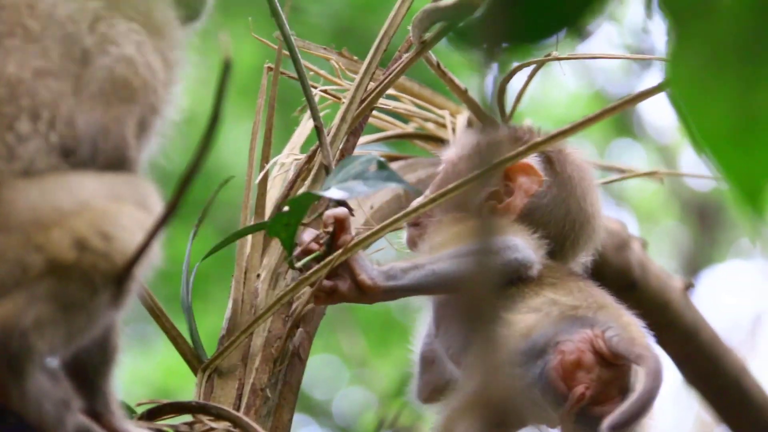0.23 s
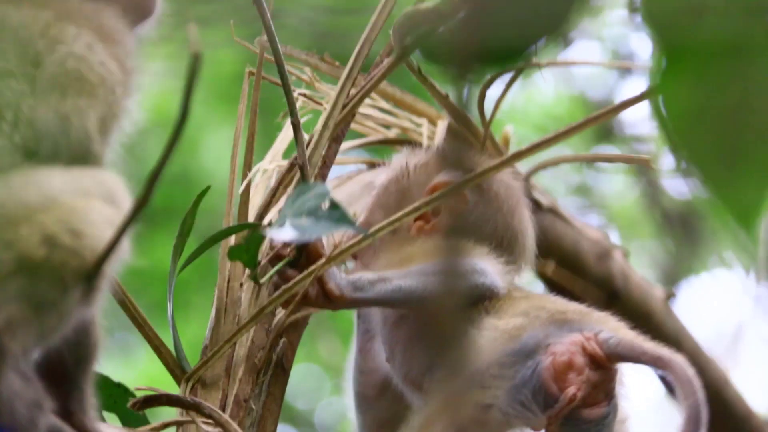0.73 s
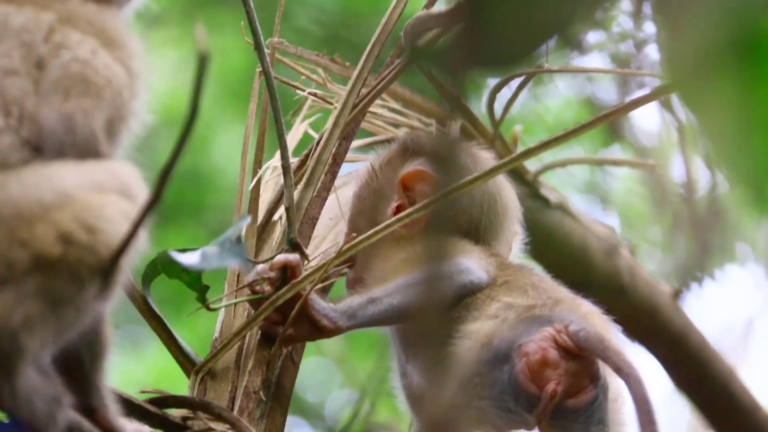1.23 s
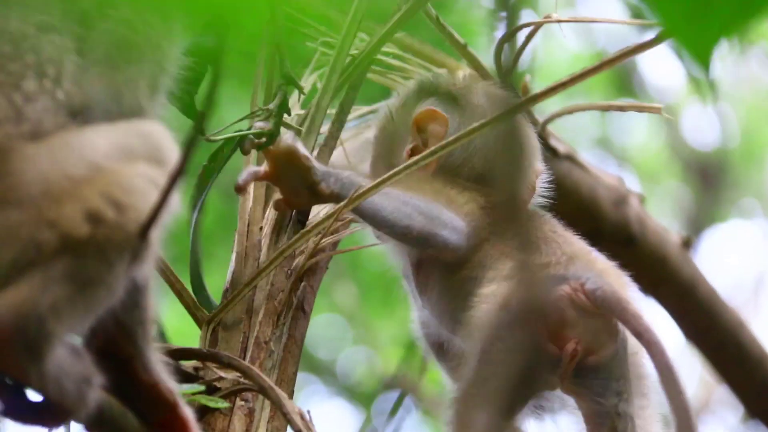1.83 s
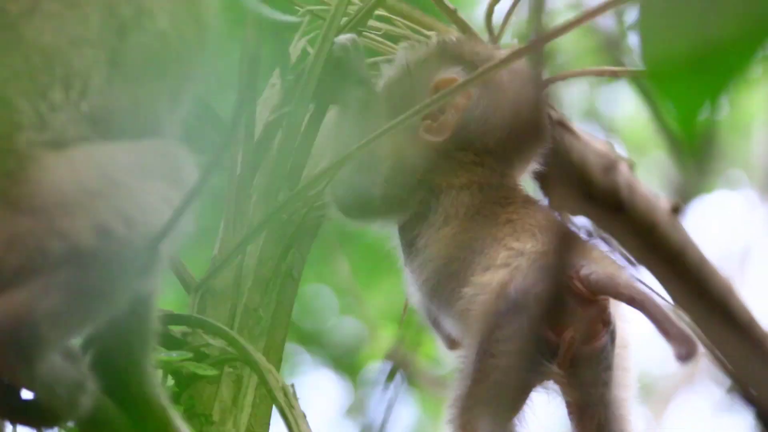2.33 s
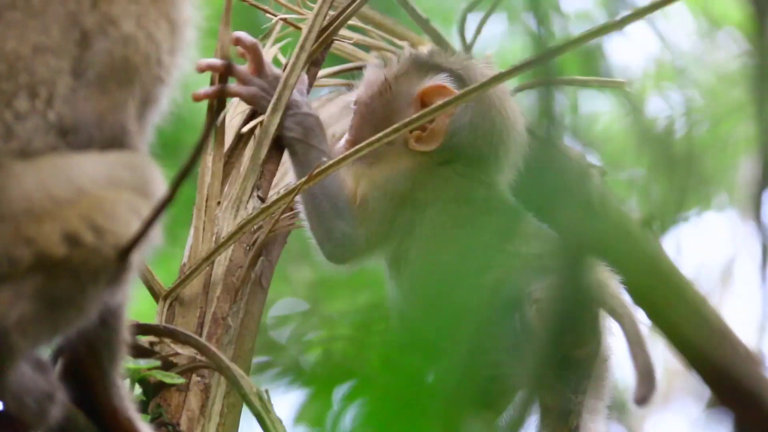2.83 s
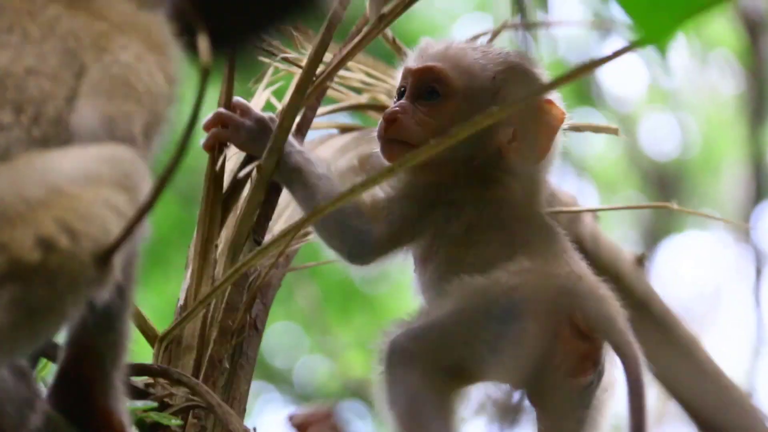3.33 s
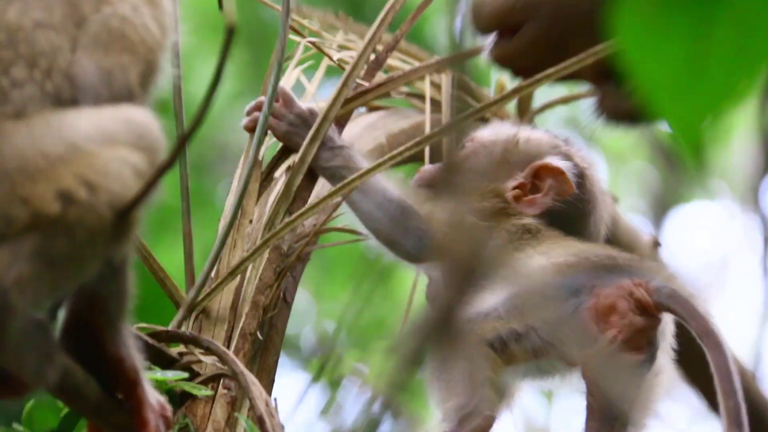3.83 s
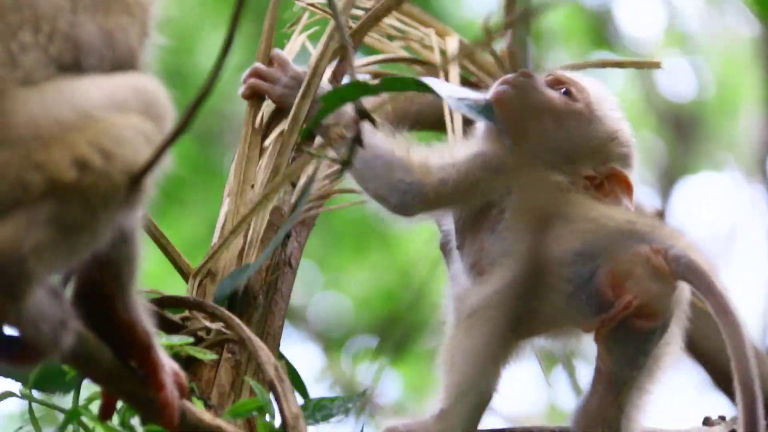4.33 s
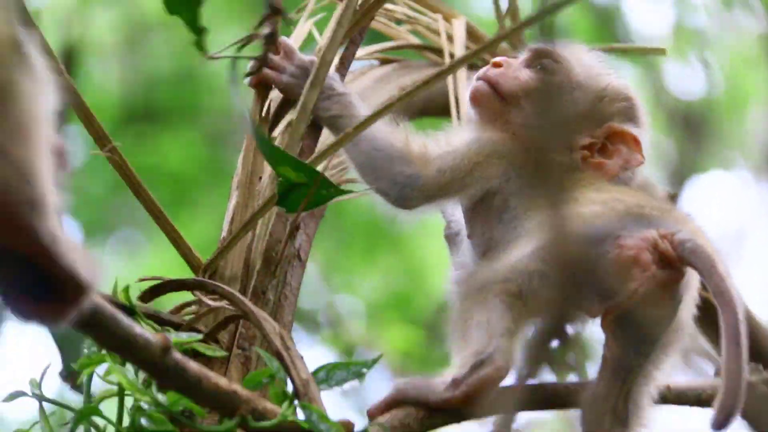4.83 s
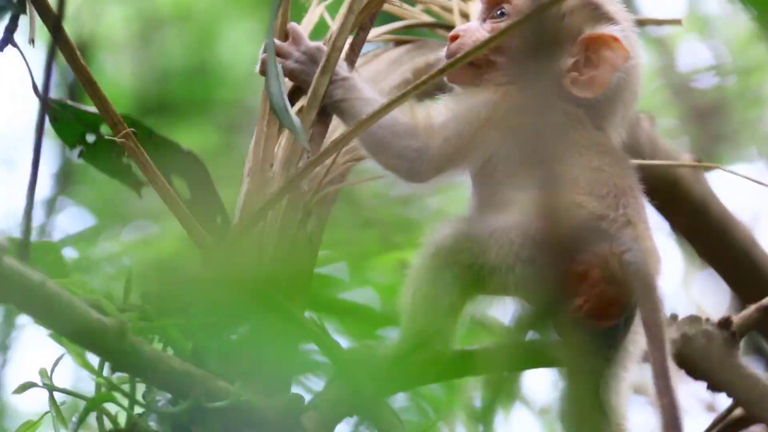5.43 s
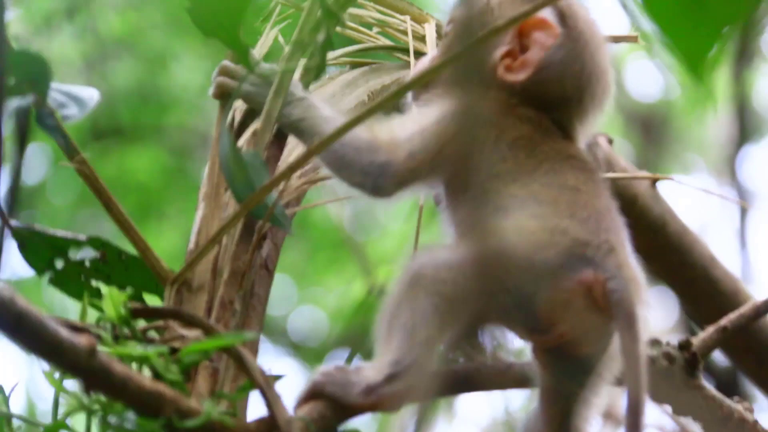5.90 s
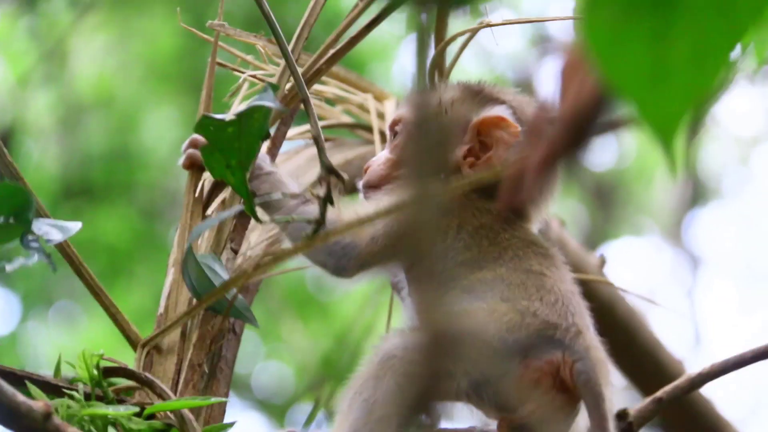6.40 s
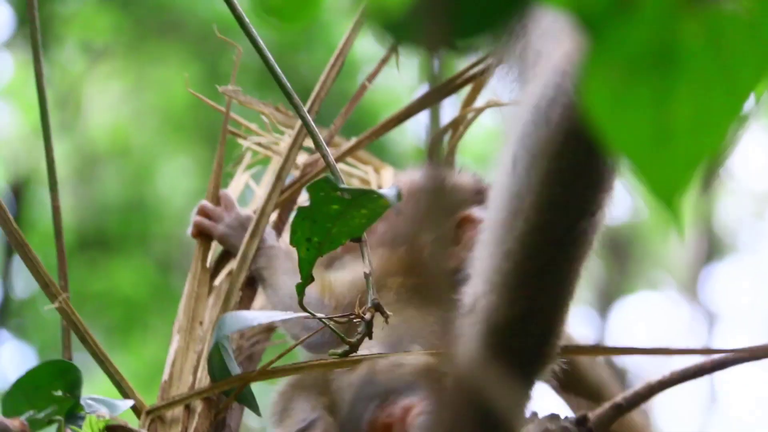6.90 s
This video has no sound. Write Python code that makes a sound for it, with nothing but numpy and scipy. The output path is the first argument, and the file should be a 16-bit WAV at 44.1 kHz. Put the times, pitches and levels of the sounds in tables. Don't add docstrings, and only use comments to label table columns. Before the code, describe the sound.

In a leafy forest, quiet hush and far rumble carry faint bird ticks, chirps, chatter, nasal trills and low dove hoots. Near three seconds a monkey whistles loudly, sliding from high to low; a lower, louder call follows, then another long, high slide. Trees smear each into echoes, and the background swells with every call before dropping back as the microphone's noise gate closes.

```python
import sys
import numpy as np
from scipy import signal
from scipy.fft import rfft, irfft, next_fast_len
from scipy.io import wavfile
from scipy.ndimage import uniform_filter1d, map_coordinates

SR = 44100
rng = np.random.default_rng(int(sys.argv[2]) if len(sys.argv) > 2 else 0)


def master_out(mix):
    frames = np.transpose(np.atleast_2d(mix))
    ceiling = np.clip(frames, -1, 1)
    pcm = np.round(ceiling * 32767).astype(np.int16)
    wavfile.write(sys.argv[1], SR, pcm)


def attenuation_scalar(level_db):
    decades = np.asarray(level_db, float) / 20
    return 10 ** decades


N = 315711

# frequency in Hz, level in dB per Hz.
LEAVES_SPECTRUM = [(90, -38.5), (140, -7), (450, -7), (1060, -9.5), (3700, -18), (5140, -30), (8000, -33),
                   (15500, -35.5)]
# frequency in Hz, level in dB per Hz.
RUMBLE_SPECTRUM = [(20, -39.5), (40, -13), (52, -4), (69, 1.5), (82, -9.5), (101, 1.5), (140, -9),
                   (180, -38)]
# time in seconds, peak level in dB.
TICKS = [(.0044, -59), (.3765, -61), (.6629, -60.5), (.9844, -60.5), (1.2416, -63), (1.7594, -59),
         (2.0482, -61.5), (2.6664, -57.5), (2.9444, -59.5), (3.2106, -64), (3.7086, -63.5), (4.0277, -63),
         (4.3173, -58.5), (4.5889, -63), (4.961, -65), (5.247, -60.5), (5.5568, -61.5), (6.1754, -59),
         (6.4702, -61.5)]
# start in seconds, length in seconds, start and end pitch in Hz, level in dB.
NOTES = [(.01, 0.043, 1923, 1574, -67.5), (0.477, 0.028, 1590, 1630, -75), (.825, .03, 3780, 3710, -71),
         (0.873, 0.025, 2510, 2390, -66), (0.935, 0.025, 2416, 2310, -62.5), (1.15, 0.045, 1836, 1850, -66),
         (1.359, 0.024, 4150, 4250, -69), (1.362, 0.017, 1250, 2500, -61), (1.41, .02, 1430, 1460, -67),
         (1.593, 0.023, 3250, 3250, -71), (2.203, 0.02, 2680, 2660, -66), (3.0, 0.02, 1390, 1555, -66),
         (6.264, 0.22, 1052, 1045, -74)]
# start in seconds, level in dB.
RISERS = [
    (.165, -68),
    (0.246, -67),
    (.335, -67),
    (.435, -66.5),
]
# length in seconds, start and end pitch in Hz.
RISER_SHAPE = (.05, 2130, 2800)
# start in seconds, level in dB.
PIPS = [
    (3.684, -94),
    (3.722, -78),
    (4.964, -80),
    (5.014, -76),
]
# length in seconds, start and end pitch in Hz.
PIP_SHAPE = (.018, 6300, 5850)
# start in seconds, start and end pitch in Hz, level in dB.
CHATTER = [(1.38, 2520, 2450, -64.5), (1.424, 2190, 2410, -52), (1.482, 2180, 2330, -63),
           (1.513, 2460, 2290, -65), (1.544, 2480, 2220, -63), (1.619, 2400, 2250, -62),
           (2.161, 2195, 2400, -54.5), (2.209, 2380, 2140, -56.5), (2.26, 2270, 2150, -58.5),
           (2.288, 2280, 2280, -62), (2.403, 2360, 2190, -65), (3.024, 2295, 2330, -53),
           (3.076, 2380, 2290, -53), (3.14, 2210, 2250, -64)]
# start in seconds, level in dB.
CHURRS = [
    (1.354, -61.5),
    (2.143, -59.5),
    (2.997, -69),
]
# multiple of the pitch, level in dB.
CHURR_PARTS = [(1, -8), (2, 1.5)]
# start in seconds, level in dB.
TRILLS = [
    (1.757, -63),
    (2.597, -62),
]
# multiple of the pitch, level in dB.
TRILL_PARTS = [(1, -14), (2, -4), (3, -9.5), (4, 0)]
# start in seconds, length in seconds, level in dB.
HOOTS = [(.23, 0.043, -60), (.62, 0.038, -67), (0.822, 0.038, -64), (1.056, 0.033, -60),
         (1.29, 0.056, -62.5), (2.17, 0.035, -66), (2.371, 0.038, -66), (2.6, 0.021, -63),
         (4.05, 0.04, -67), (4.72, 0.067, -58), (5.205, 0.02, -59.5), (5.409, 0.038, -63.5),
         (5.652, 0.032, -65), (5.839, 0.14, -59), (6.17, 0.047, -62.5), (6.39, 0.034, -60),
         (6.61, 0.033, -61)]
# start in seconds, end in seconds, level in dB.
CRICKET_BOUTS = [
    (.72, 1.2, -77),
    (1.8, 2.47, -69),
    (2.61, 3.006, -72.5),
    (5.0, 6.3, -92),
    (5.971, 6.217, -75),
    (6.75, 7.3, -88),
]
# start in seconds, length in seconds, start and end pitch in Hz, level in dB.
SLIDES = [
    (.72, .08, 3240, 2990, -62),
    (1.2, .075, 1930, 1480, -65),
    (2.39, .275, 6800, 5720, -80),
    (4.05, .265, 7150, 5950, -81),
]
# start in seconds, level in dB.
HOOKS = [
    (6.627, -74),
    (7.093, -76.5),
]
# time into the chirp in seconds, pitch in Hz.
HOOK_PITCH = [(0, 5640), (.006, 6350), (.018, 6450), (.026, 5800), (.04, 4050), (.052, 2920)]
# time in seconds, pitch in Hz, level in dB.
CRIES = [
    [(2.825, 4740, -77), (2.845, 4310, -48.5), (2.872, 3630, -45), (2.91, 3370, -40.5), (2.97, 3198, -35),
     (3.015, 3180, -47.5), (3.075, 3056, -40.5), (3.14, 2860, -42), (3.312, 2083, -51)],
    [(3.605, 2727, -54.5), (3.648, 2468, -39.5), (3.684, 2240, -45), (3.708, 2114, -28), (3.755, 1920, -46),
     (3.787, 1820, -35), (3.845, 1663, -39), (3.9, 1695, -45), (3.98, 1727, -43.5)],
    [(4.468, 4450, -77), (4.486, 4500, -52.5), (4.512, 3756, -41.5), (4.545, 3413, -40.5),
     (4.6, 3244, -32.5), (4.655, 3104, -38), (4.755, 2992, -39), (4.85, 2592, -40.5), (4.97, 2062, -54)],
]
# long tail in dB, near leaves in dB, octave in dB.
CRY_ECHO = [
    (1.5, -7, -7.5),
    (-5, -6, 0.5),
    (-0.5, -2.5, -5),
]
# frequency in Hz, gain in dB.
MOUTH = [(3300, -36), (3850, -21.5), (4150, -48), (5700, -66), (6050, -41.5), (6650, -31), (6900, -64),
         (9500, -53.5)]
# frequency in Hz, decay by 60 dB in seconds.
FOREST_T60 = [(1500, 0.96), (2500, 1.61), (3500, 1.356), (5000, 1.9), (8000, 0.44)]
# frequency in Hz, decay by 60 dB in seconds.
THICKET_T60 = [(1000, 0.52), (3000, 1), (7000, 0.12)]
# opens, starts to sag, steps down and shuts, all in seconds.
GATE = [
    (2.83, 3.33, 3.422, 3.503),
    (3.628, 3.98, 4.025, 4.146),
    (4.47, 5.0, 5.124, 5.225),
]
# lift in dB, loss while sagging in dB.
GATE_LIFT = [
    (14.5, 8.5),
    (14.5, 9),
    (15.5, 7),
]


def along(points, hz):
    f, v = np.transpose(points)
    return np.interp(np.log(hz + 1), np.log(f + 1), v)


def wobble(rate_hz):
    knots = rng.standard_normal(int(N * rate_hz / SR) + 4)
    return map_coordinates(knots, [np.arange(N) * rate_hz / SR])


def coloured(spectrum):
    m = next_fast_len(N + 8192)
    gain = attenuation_scalar(along(spectrum, np.fft.rfftfreq(m, 1 / SR)))
    noise = irfft(rfft(rng.standard_normal(m)) * gain, m)[:N]
    return noise / noise.std()


def glide(length_s, start_hz, end_hz):
    return np.linspace(start_hz, end_hz, round(length_s * SR))


def add_note(track, start_s, pitch_hz, level_db, parts=((1, 0),)):
    phase = 2 * np.pi * np.cumsum(pitch_hz) / SR
    tone = sum(attenuation_scalar(part_db) * np.sin(k * phase) for k, part_db in parts)
    note = attenuation_scalar(level_db + 4.5) * signal.windows.tukey(len(pitch_hz), .4) * tone
    piece = track[round(start_s * SR):][:len(pitch_hz)]
    piece += note[:len(piece)]


def echoes(x, t60s, wet_db, near_db, near_t60_s):
    hz, t, z = signal.stft(rng.standard_normal(2 * SR), SR, nperseg=256)
    decay = attenuation_scalar(-60 * t / along(t60s, hz)[:, None])
    tail = signal.istft(z * decay, SR, nperseg=256)[1]
    leaves = rng.standard_normal(len(tail)) * attenuation_scalar(-60 * np.arange(len(tail)) / SR / near_t60_s)
    tail *= attenuation_scalar(1.198 * wobble(35)[:len(tail)])
    tail *= attenuation_scalar(wet_db) / np.linalg.norm(tail)
    leaves *= attenuation_scalar(near_db) / np.linalg.norm(leaves)
    return x + signal.fftconvolve(x, tail + leaves)[:N]


def air():
    leaves = attenuation_scalar(-59.5 + .2 * wobble(2.2)) * coloured(LEAVES_SPECTRUM)
    rumble = attenuation_scalar(-63.5 + .28 * wobble(1.3)) * coloured(RUMBLE_SPECTRUM)
    return leaves + rumble


def ticker():
    ticks = np.zeros(N)
    top_hz, foot_hz, tilt_db = 7830, 4060, 5.5
    height = np.linspace(1, 0, round(.011 * SR)) ** 1.4
    pitch_hz = foot_hz + (top_hz - foot_hz) * height
    for peak_s, db in TICKS:
        add_note(ticks, max(peak_s - .008, 0), pitch_hz, db - 11 - tilt_db * height)
    return ticks


def birds():
    song = np.zeros(N)
    quaver = 1 + .016 * wobble(130)
    chatter_s = .019
    whistles = NOTES + [(s, chatter_s, *note) for s, *note in CHATTER]
    whistles += [(s, *RISER_SHAPE, db) for s, db in RISERS]
    whistles += [(s, *PIP_SHAPE, db) for s, db in PIPS]
    for s, length_s, start_hz, end_hz, db in whistles:
        pitch_hz = glide(length_s, start_hz, end_hz)
        add_note(song, s, pitch_hz * quaver[round(s * SR):][:len(pitch_hz)], db)
    for s, db in CHURRS:
        add_note(song, s, glide(.022, 1340, 1650), db, CHURR_PARTS)
    gap_s, swell_db, tire_db = .0733, 1, 8
    for s, db in TRILLS:
        for k, uneven_db in enumerate(1.5 * rng.standard_normal(6)):
            note_db = db + uneven_db + k * swell_db - tire_db * (k > 3)
            add_note(song, s + k * gap_s, glide(.028, 945, 867), note_db, TRILL_PARTS)
    return song


def dove():
    hoots = np.zeros(N)
    for s, length_s, db in HOOTS:
        add_note(hoots, s, glide(length_s, 228.6, 208.6), db, [(1, -1), (2, -9)])
    return hoots


def cricket():
    wing = coloured([(4250, -58), (4440, -3), (4520, 0), (4620, -7), (4800, -60)])
    t = np.arange(N) / SR
    fade_s = .11
    bouts = attenuation_scalar(-92)
    for start_s, end_s, db in CRICKET_BOUTS:
        inside_s = np.minimum(t - start_s, end_s - t)
        bouts = bouts + attenuation_scalar(db) * np.clip(inside_s / fade_s + .5, 0, 1)
    return bouts * attenuation_scalar(-8 + 2.9 * wobble(25)) * wing


def canopy():
    song = np.zeros(N)
    for s, length_s, start_hz, end_hz, db in SLIDES:
        add_note(song, s, glide(length_s, start_hz, end_hz), db)
    knot_s, knot_hz = np.transpose(HOOK_PITCH)
    hook_hz = np.interp(np.arange(0, knot_s[-1], 1 / SR), knot_s, knot_hz)
    hook_hz = uniform_filter1d(hook_hz, size=150)
    for s, db in HOOKS:
        add_note(song, s, hook_hz, db + np.linspace(0, 7, len(hook_hz)))
    return song


def monkey():
    voice, t = np.zeros(N), np.arange(N) / SR
    flutter_db, quaver_hz = 1.3 * wobble(30), 11 * wobble(40)
    release_s, release_db = .014, 31
    for rows, (wet_db, near_db, octave_db) in zip(CRIES, CRY_ECHO):
        end_s, end_hz, end_db = rows[-1]
        release = (end_s + release_s, end_hz, end_db - release_db)
        s, hz, db = np.transpose(rows + [release])
        pitch_hz = uniform_filter1d(np.interp(t, s, hz), size=800)
        phase = 2 * np.pi * np.cumsum(pitch_hz + quaver_hz) / SR
        octave = attenuation_scalar(octave_db + along(MOUTH, 2 * pitch_hz)) * np.sin(2 * phase)
        sounding = (t > s[0]) * (t < s[-1])
        cry = sounding * attenuation_scalar(np.interp(t, s, db) + flutter_db) * (np.sin(phase) + octave)
        voice += echoes(cry, FOREST_T60, wet_db, near_db, near_t60_s=.15)
    return voice


def hillside(x):
    delay_s = .73
    dull = signal.sosfilt(signal.butter(4, 2100, fs=SR, output="sos"), x)
    return attenuation_scalar(-28) * np.pad(dull, (round(delay_s * SR), 0))[:N]


def gate_db(t):
    lift = np.zeros(len(t))
    rise_s, step_db = .053, 4.5
    for (opens_s, sags_s, steps_s, shuts_s), (lift_db, sag_db) in zip(GATE, GATE_LIFT):
        rise = lift_db * (1 - np.exp(-np.maximum(t - opens_s, 0) / rise_s))
        held = rise - np.interp(t, [sags_s, steps_s], [0, sag_db])
        lift += np.where(t < steps_s, held, step_db * (t < shuts_s))
    return uniform_filter1d(lift, size=250)


def scene():
    hidden = echoes(ticker() * attenuation_scalar(-2.5), THICKET_T60, wet_db=6, near_db=8, near_t60_s=.12)
    far = echoes(birds() * attenuation_scalar(-1), THICKET_T60, wet_db=-2, near_db=-1.5, near_t60_s=.13)
    above = echoes(canopy(), THICKET_T60, wet_db=-3, near_db=-6, near_t60_s=.1)
    near = monkey()
    return (air() + hidden + far + dove() + cricket() + above + near + hillside(near))[None]


def low_pass(x):
    return signal.sosfilt(signal.butter(12, 15640, fs=SR, output="sos"), x)


def record(dry):
    converter_offset = -.00029
    mix = (dry + converter_offset) * attenuation_scalar(gate_db(np.arange(N) / SR))
    return low_pass(mix)


dry = scene()
out = record(dry)
master_out(out)
```